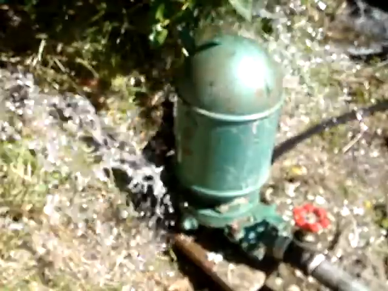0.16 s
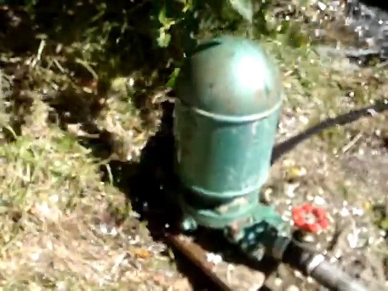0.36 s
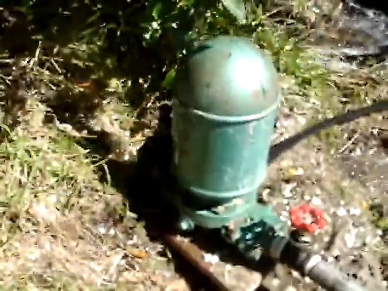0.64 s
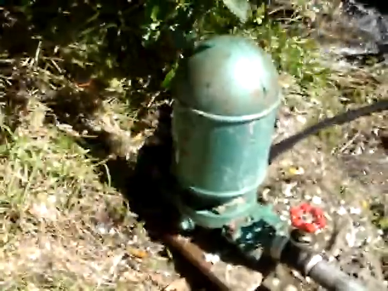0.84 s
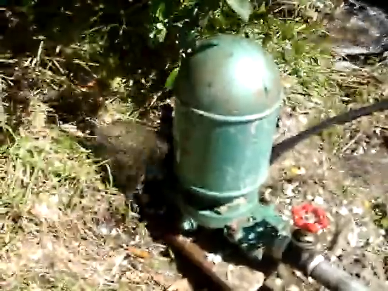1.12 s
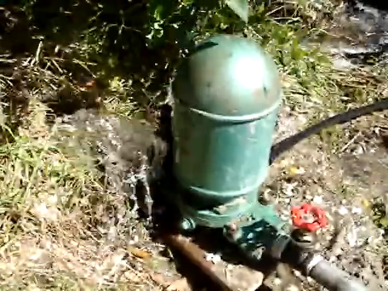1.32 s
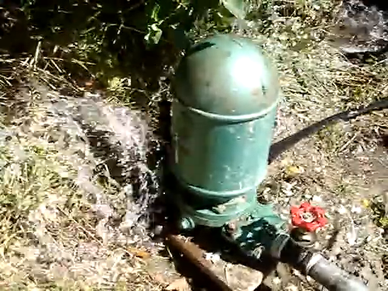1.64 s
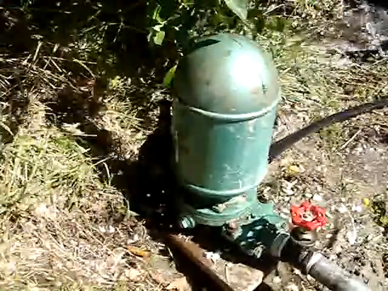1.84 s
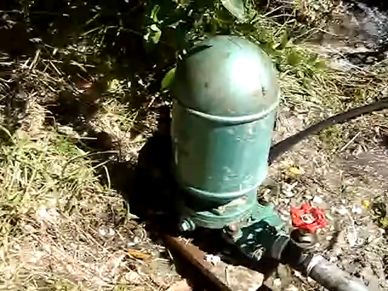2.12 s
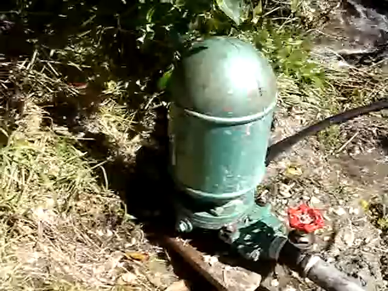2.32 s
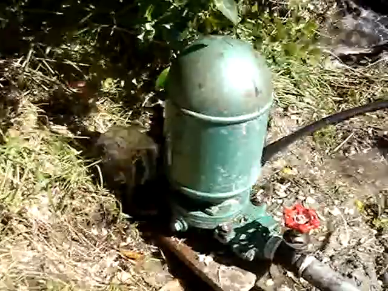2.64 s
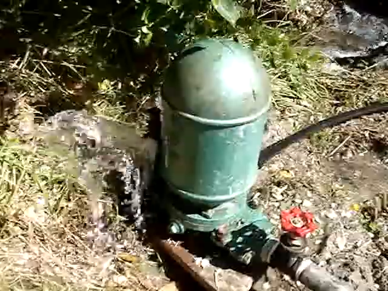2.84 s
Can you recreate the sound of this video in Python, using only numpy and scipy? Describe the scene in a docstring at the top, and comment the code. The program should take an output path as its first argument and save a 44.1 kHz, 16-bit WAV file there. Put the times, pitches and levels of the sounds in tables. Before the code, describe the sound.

A ram pump works beside a steadily rushing stream, heard close through a small dull-topped microphone. Strong gushing and spatter open; at 0.2 s the valve slams, a double knock with low thud, bright crack and brief iron ring. The gush collapses, leaving stream, drips and plops, then swells from about 0.35 s with gurgles and splashes. At 1.73 s a slightly louder slam repeats the cycle, building until 2.9 s.

```python
"""A stream rushes steadily while water gushes from the waste valve of a ram pump, close to a small microphone.
Then the valve slams with a thud and a clack that rings in the iron body; the gush dies and builds again.
Stream and gush are bands of hiss mixed with bubbles; gurgles, plops and drops are short rising tones.
Spatter, puffs, slaps and splashes are filtered clicks or noise; the slams add noise bursts, tones
and a slow pressure bump."""
import sys
import numpy as np
from scipy import signal
from scipy.io import wavfile

SR = 44100
rng = np.random.default_rng(int(sys.argv[2]) if len(sys.argv) > 2 else 0)


def master_out(mix):
    """Clip the mix to full scale and print it as 16-bit PCM to the path in sys.argv[1]."""
    frames = np.transpose(np.atleast_2d(mix))
    ceiling = np.clip(frames, -1, 1)
    pcm = np.round(ceiling * 32767).astype(np.int16)
    wavfile.write(sys.argv[1], SR, pcm)


N = 130977  # length in samples

# Colour of the steady stream; only its shape matters. Each row: pitch in Hz, level in dB per Hz.
STREAM_COLOUR = [(15, -87.5), (25, -62), (144, -34), (163, -11), (283, -8), (412, -8.5), (491, -5.5),
                 (810, -2.5), (873, -1), (1070, -3), (1760, -7), (1900, -7), (2040, -7.5), (3450, -10),
                 (9880, -30), (12800, -61), (21700, -120)]
# Colour of the gush; only its shape matters. Each row: pitch in Hz, level in dB per Hz.
GUSH_COLOUR = [(15, -60.5), (25, -38), (101, -33.5), (180, -4.5), (283, -4.5), (402, 1.5), (503, -2),
               (630, 1), (851, 2.5), (2830, -3.5), (9880, -23), (12800, -58), (21700, -120)]
# Water in the pipe, humming with the flow.
# Each row: pitch in Hz, width in Hz, level in dB before the flow scales it.
PIPE_HUMS = [(290, 53, -39.5), (863, 52, -38), (1086, 185, -38.5), (2138, 210, -35)]
# Fat drops striking water close by.
# Each row: start in seconds, height in dB before the bass is cut, starting pitch in Hz.
DROPS = [(0.028, -18, 1130), (0.065, -19, 910), (0.094, -8.5, 800), (0.131, -7, 1410), (0.146, -16, 705),
         (0.955, -12, 958), (1.055, -15, 1600), (1.18, -14, 1030), (1.272, -10.5, 851), (1.496, -8, 860),
         (1.523, -12, 1080), (1.64, -9.5, 760), (1.673, -10, 870), (2.308, -10.5, 1110), (2.389, -17, 958),
         (2.45, -14, 668), (2.56, -12, 760), (2.624, -14, 1320), (2.715, -10, 999), (2.811, -10, 1020)]
# Slams of the waste valve; the first lies before the start and only sets the gush.
# Each row: start in seconds, level in dB.
SLAMS = [(-2.9, -9), (0.1985, -7.5), (1.7265, -6)]
# Bands of the crack. Each row: low edge in Hz, high edge in Hz, level in dB relative to the slam.
CRACK_BANDS = [(2400, 3800, 6), (900, 1600, 2), (1600, 2400, 0), (4000, 7000, -4), (7000, 9500, -12)]
# Ringing tones of the iron body. Each row: pitch in Hz, relative level in dB, time to fade by 60 dB in seconds.
BODY_TONES = [(1701, -2.5, 1.0), (3530, -9, .4), (3595, -6, .7), (3678, -4, .6), (3718, -8, .4),
              (3745, 0, .5), (3790, -6, .7), (4203, -9, .3), (4443, -8, .3), (5685, -14, .3),
              (9818, -14.5, .55)]
# Sharp splashes on stone and iron. Each row: start in seconds, level in dB before filtering.
SPLASHES = [(0.4546, -22), (0.8644, -11), (1.0367, -12), (1.1174, -17), (1.1923, -8), (1.2341, -20),
            (1.6572, -6.5), (1.839, -16), (1.8915, -10.5), (1.9156, -9.5), (2.05, -10.5), (2.492, -19),
            (2.646, -14), (2.8436, -12)]
# Slugs of water landing.
# Each row: start in seconds, height in dB before the bass is cut, starting pitch in Hz.
PLOPS = [(0.456, -23, 296), (0.539, -19, 280), (0.739, -23.5, 179), (0.805, -19, 298), (0.866, -16, 310),
         (0.92, -34, 306), (1.089, -23, 456), (1.153, -29, 479), (1.375, -15, 456), (1.605, -18.5, 293),
         (1.825, -23, 193), (1.907, -21, 350), (2.042, -17.5, 268), (2.249, -26, 170), (2.363, -27, 367),
         (2.61, -19.5, 403), (2.839, -21, 369)]

# A T60 is the time to fade by 60 dB. A RISE is the share by which a bubble climbs in pitch.
STREAM_DB, GUSH_FULL_DB = -23, -23
GUSH_WAIT_S, GUSH_RISE_S, GUSH_FALL_S = 0.12, 0.53, 0.08  # rise and fall are time constants
BUBBLES_PER_S, BUBBLE_CYCLES, BUBBLE_RISE = 4000, 8.5, 0.056
BUBBLE_SPREAD_DB, BUBBLE_SHARE_DB = 2.5, -4  # unevenness; level against the hiss
SPATTER_PER_S, SPATTER_DB, SPATTER_SPREAD_DB, SPATTER_IDLE = 640, -47.5, 5.5, 0.32
GURGLES_PER_S, GURGLE_DB, GURGLE_LOW_HZ, GURGLE_HIGH_HZ, GURGLE_CYCLES = 90, -41, 156, 585, 13
GURGLE_FALL_S, GURGLE_IDLE = 0.022, 0.35  # gurgling stops fast at a slam; share that stays
PUFFS_PER_S, PUFF_DB, PUFF_LOW_HZ, PUFF_TOP_HZ = 22, -63, 11, 91.5
SLAPS_PER_S, SLAP_DB, SLAP_LOW_HZ, SLAP_HIGH_HZ = 450, -33, 526, 2650
DROP_CYCLES, PLOP_CYCLES, PLOP_RISE = 3.25, 4.4, 0.096
BASS_CUT_HZ = 118.6

# Levels inside a slam are relative to that slam.
KNOCK_T60_S, KNOCK_DB, KNOCK_LOW_HZ, KNOCK_HIGH_HZ = .03, 1, 450, 1300
BOUNCE_S, BOUNCE_DB, BOUNCE_T60_S = .0085, -2, .08  # the valve plate knocks again; dB against the first knock
PLATE_HZ, PLATE_DB, PLATE_T60_S = 550, -11, .06  # hollow note of the second knock
THUD_DB, THUD_DIP_S = -31.5, .007
REBOUND_DB, REBOUND_FALL_S = -1.5, .027  # dB against the dip
CRACK_T60_S, CRACK_DELAY_S, CRACK_AGAIN_S = .022, .001, .0025
RING_DB, RING_BLOOM_S, RING_WAVER_DB = -19.5, 0.014, 1.5
LULL_SHARE, LULL_FALL_S, LULL_HOLD_S, LULL_TOP_HZ = .35, .012, .4, 650
SPLASH_T60_S, SPLASH_LOW_HZ, SPLASH_HIGH_HZ = .045, 600, 3000
LIMIT, CUTOFF_HZ = 1.0, 10000


def from_db(db):
    """Turn decibels into a multiplier."""
    return 10 ** (np.asarray(db) / 20)


def rms_one(x):
    """Scale a sound to an average strength (rms) of 1."""
    return x / np.sqrt(np.mean(x ** 2) + 1e-20)


def at_hz(points, hz):
    """Read a colour table at one pitch, with straight lines on a log-pitch axis."""
    points = np.array(points)
    return np.interp(np.log(hz), np.log(points[:, 0]), points[:, 1])


def drift(rate):
    """Wander at random with spread 1, by smoothing noise; a higher rate in Hz wanders faster."""
    step = 40  # compute one value per 40 samples, then join them with lines
    r = np.exp(-2 * np.pi * step * rate / SR)
    noise = rng.standard_normal(N // step + 2002)
    slow = signal.lfilter([1], [1, -2 * r, r * r], noise)[2000:]  # let the filter settle
    return np.interp(np.arange(N) / step, np.arange(len(slow)), rms_one(slow - slow.mean()))


def band(x, low_hz, high_hz):
    """Keep mainly the pitches between two edges."""
    sos = signal.butter(2, [low_hz, min(high_hz, .45 * SR)], "band", fs=SR, output="sos")
    return signal.sosfilt(sos, x)


def since(s):
    """Give the seconds after a moment, zero before it, and whether it has come."""
    t = np.arange(N) / SR - s
    return np.maximum(t, 0), t >= 0


def dying(t, t60):
    """Fade steadily in dB, by 60 dB in t60 seconds."""
    return from_db(-60 * t / t60)


def burst(s, t60):
    """Noise that starts at once and dies."""
    t, on = since(s)
    return rng.standard_normal(N) * dying(t, t60) * on + 1e-18


def bubble(hz, cycles, rise):
    """A bubble: a fading tone with envelope peak 1 that swells quickly and climbs in pitch as it dies."""
    turn = np.arange(int(cycles * SR / hz)) * hz / SR
    swell = (1 - np.exp(-turn)) ** 2 * dying(turn, cycles)
    climbing = turn * (1 + rise * turn / cycles / 2)
    return swell / swell.max() * np.sin(2 * np.pi * climbing)


def grains(per_s, spread_db):
    """Clicks at random moments, of uneven size and either sign."""
    sizes = from_db(spread_db * np.minimum(rng.exponential(1, N), 5))
    signs = rng.choice([-1, 1], N)
    return sizes * signs * (rng.random(N) < per_s / SR)


def thin(x):
    """Cut the deep bass, which the small microphone hardly picks up."""
    return signal.sosfilt(signal.butter(6, BASS_CUT_HZ, "high", fs=SR, output="sos"), x)


def water(colour, shared_db, own_db):
    """Rushing water: third-octave bands of hiss and bursting bubbles flicker together and apart; rms 1."""
    edges = 20 * 2 ** np.arange(0, 9.3, 1 / 3)
    together, near = drift(12.6), drift(12)
    white = rng.standard_normal((2, N))
    clicks = grains(BUBBLES_PER_S, BUBBLE_SPREAD_DB)
    dealt = (rng.random(N) ** .6 * (len(edges) - 1)).astype(int)  # more bubbles go to higher bands
    out = 0
    for k, (low, high) in enumerate(zip(edges, edges[1:])):
        hz = np.sqrt(low * high)
        one = bubble(hz / (1 + BUBBLE_RISE / 4), min(BUBBLE_CYCLES, hz / 20), BUBBLE_RISE)
        pops = signal.oaconvolve(clicks * (dealt == k), one)[:N]
        bubbles = rms_one(band(pops, low / 1.178, high * 1.2))
        hiss = rms_one(band(white[k % 2], low, high))
        near = 0.65 * near + 0.52 * drift(20.4)  # neighbouring bands flicker partly alike
        level_db = at_hz(colour, hz) + shared_db * together + own_db * near
        # the square root turns a level per Hz into a level for the whole band
        out = out + from_db(level_db) * np.sqrt(high - low) * (hiss + from_db(BUBBLE_SHARE_DB) * bubbles)
    return rms_one(out)


def stream():
    """The steady rush of the stream, its low part thinned after each slam."""
    return from_db(STREAM_DB) * lulled(water(STREAM_COLOUR, shared_db=0.48, own_db=2.02))


def gush_flow(fall_s):
    """Flow through the waste valve, 0 to 1: it waits and builds after each slam, and dies at the next."""
    flow = np.zeros(N)
    times = [s for s, _ in SLAMS] + [np.inf]
    for s, shut in zip(times, times[1:]):
        build = 1 - np.exp(-since(s + GUSH_WAIT_S)[0] / GUSH_RISE_S)
        flow += build * np.exp(-since(shut)[0] / fall_s)
    return flow


def gush(flow):
    """Water gushing from the waste valve, as loud as the flow is strong."""
    return from_db(GUSH_FULL_DB) * flow * water(GUSH_COLOUR, shared_db=-1.23, own_db=1.0)


def spatter(flow):
    """Fine high drops: random clicks in a narrow treble band; some stay when the flow stops."""
    ticks = band(grains(SPATTER_PER_S, SPATTER_SPREAD_DB) + 1e-18, 5600, 7000)
    return (SPATTER_IDLE + flow) * from_db(SPATTER_DB) * rms_one(ticks)


def gurgles():
    """Large bubbles at random, each with one of twelve pitches."""
    clicks, dealt = grains(GURGLES_PER_S, spread_db=2.2), rng.integers(0, 12, N)
    big = 0
    for k, hz in enumerate(np.geomspace(GURGLE_LOW_HZ, GURGLE_HIGH_HZ, num=12)):
        big = big + signal.oaconvolve(clicks * (dealt == k), bubble(hz, GURGLE_CYCLES, PLOP_RISE))[:N]
    return from_db(GURGLE_DB) * rms_one(big)


def pipe_hum():
    """Water humming in the pipe: bands of noise that waver slowly in level."""
    hum = 0
    for hz, width, db in PIPE_HUMS:
        tone = rms_one(band(rng.standard_normal(N), hz - width / 2, hz + width / 2))
        hum = hum + from_db(db + 1.5 * drift(4.9)) * tone
    return hum


def puffs():
    """Soft low bumps at the microphone: random clicks with only the bass kept."""
    bumps = grains(PUFFS_PER_S, spread_db=0.5) + 1e-18
    return from_db(PUFF_DB) * rms_one(band(bumps, PUFF_LOW_HZ, PUFF_TOP_HZ))


def slaps():
    """Fat drops slapping down in clumps: one-sided clicks, filtered into short pops."""
    per_s = SLAPS_PER_S * from_db(2.7 * drift(7.1))
    pops = -np.abs(grains(per_s, spread_db=3.5))
    return from_db(SLAP_DB) * rms_one(band(pops + 1e-18, SLAP_LOW_HZ, SLAP_HIGH_HZ))


def landings(table, cycles):
    """Water landing on water: each drop or slug sounds one bubble that climbs in pitch."""
    out = np.zeros(N + SR)  # room for the last tail
    for s, db, hz in table:
        plop = from_db(db) * bubble(hz, cycles, PLOP_RISE)
        start = int(s * SR)
        out[start:start + len(plop)] += plop
    return out[:N]


def knock(s):
    """The valve knocks twice: two bursts of noise, the second longer and with a hollow note."""
    knocks = burst(s, KNOCK_T60_S) + from_db(BOUNCE_DB) * burst(s + BOUNCE_S, BOUNCE_T60_S)
    late = since(s + BOUNCE_S)[0]
    note = from_db(PLATE_DB) * dying(late, PLATE_T60_S) * np.sin(2 * np.pi * PLATE_HZ * late)
    return from_db(KNOCK_DB) * band(knocks, KNOCK_LOW_HZ, KNOCK_HIGH_HZ) + note


def thud(s):
    """The pressure dips, then rebounds and fades."""
    t = since(s)[0]
    part = np.minimum(t / THUD_DIP_S, 1)  # how much of the dip has passed
    dip = np.sin(np.pi * part)
    rebound = from_db(REBOUND_DB) * part ** 2 * np.exp(-(t - THUD_DIP_S * part) / REBOUND_FALL_S)
    return from_db(THUD_DB) * (rebound - dip)


def crack(s):
    """Two contacts in quick succession: short bursts of noise, weighted band by band."""
    first = s + CRACK_DELAY_S
    snap = burst(first, CRACK_T60_S) + burst(first + CRACK_AGAIN_S, CRACK_T60_S)
    return sum(from_db(db) * band(snap, low, high) for low, high, db in CRACK_BANDS)


def body_ring(s):
    """The iron body rings: tones swell up and fade, and water sloshing inside makes each one waver."""
    t = since(s)[0]
    ring = 0
    for hz, db, t60 in BODY_TONES:
        tone = np.sin(2 * np.pi * (hz * t + rng.random()))
        ring = ring + from_db(db + RING_WAVER_DB * drift(10)) * dying(t, t60) * tone
    return from_db(RING_DB) * ring * (1 - np.exp(-t / RING_BLOOM_S))


def valve():
    """Each slam adds up a double knock, a thud, a bright crack and the ring of the body."""
    return sum(from_db(db) * (knock(s) + thud(s) + crack(s) + body_ring(s)) for s, db in SLAMS[1:])


def lulled(x):
    """Right after each slam the low part of the rush sinks, then returns."""
    lull = 0
    for s, _ in SLAMS[1:]:
        t = since(s)[0]
        lull = lull + (1 - np.exp(-t / LULL_FALL_S)) * np.exp(-(t / LULL_HOLD_S) ** 2)
    lows = signal.sosfiltfilt(signal.butter(2, LULL_TOP_HZ, fs=SR, output="sos"), x)
    return x - LULL_SHARE * lull * lows


def splashes():
    """Sharp splashes on stone and iron: short bursts of noise in a broad band."""
    spray = sum(from_db(db) * burst(s, SPLASH_T60_S) for s, db in SPLASHES)
    return band(spray, SPLASH_LOW_HZ, SPLASH_HIGH_HZ)


def scene():
    """Add all the water and the valve, alike in both channels."""
    flow = gush_flow(GUSH_FALL_S)
    gurgle_flow = GURGLE_IDLE + gush_flow(GURGLE_FALL_S)
    mono = stream() + gush(flow) + spatter(flow)
    mono += gurgle_flow * (thin(gurgles() + pipe_hum()) + puffs() + slaps())
    mono += thin(landings(DROPS, DROP_CYCLES) + splashes() + landings(PLOPS, PLOP_CYCLES))
    mono += valve()
    return np.array([mono, mono])


def record(dry):
    """The small microphone: peaks are rounded off and the treble above the cutoff is removed."""
    rounded = LIMIT * np.tanh(dry / LIMIT)
    return signal.sosfilt(signal.ellip(14, .3, 85, CUTOFF_HZ, fs=SR, output="sos"), rounded)


dry = scene()
out = record(dry)
master_out(out)
```